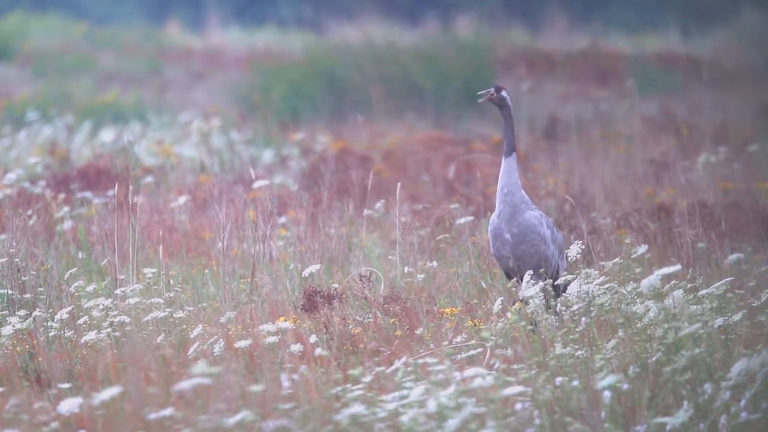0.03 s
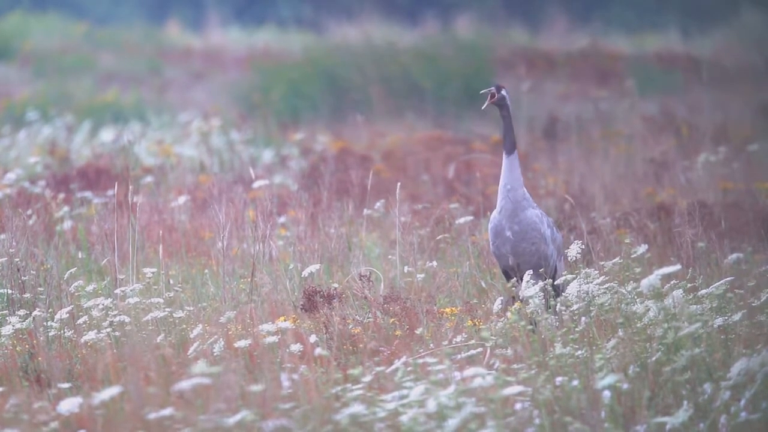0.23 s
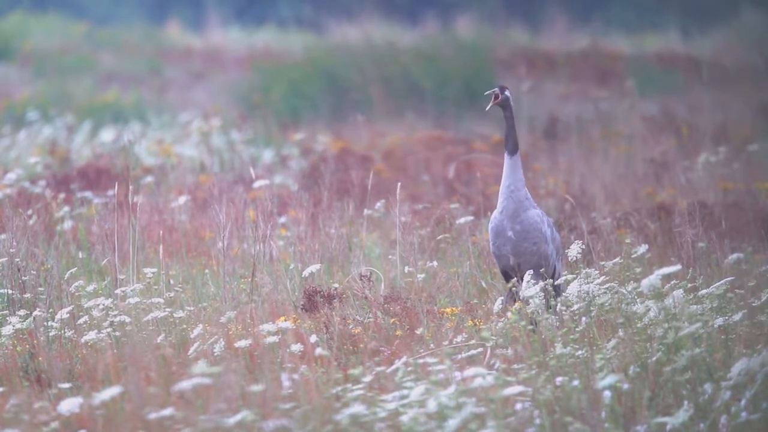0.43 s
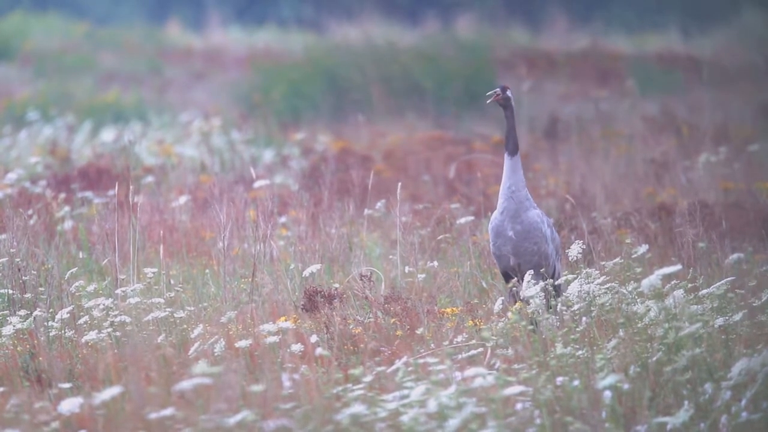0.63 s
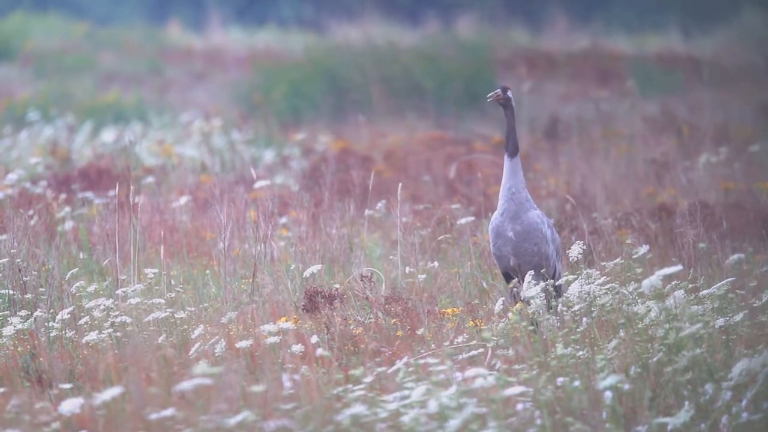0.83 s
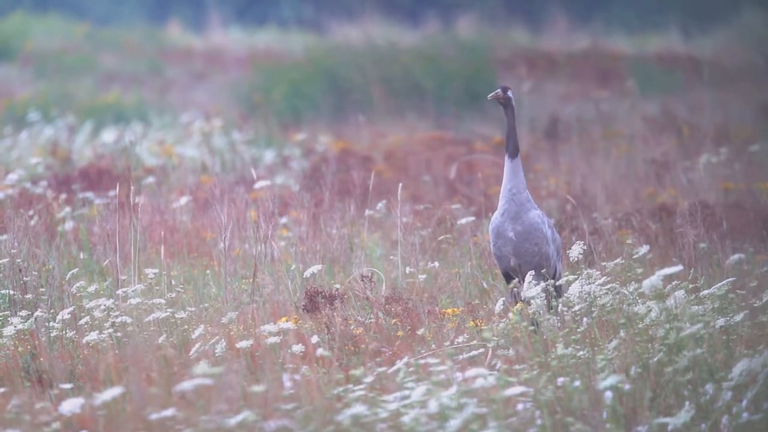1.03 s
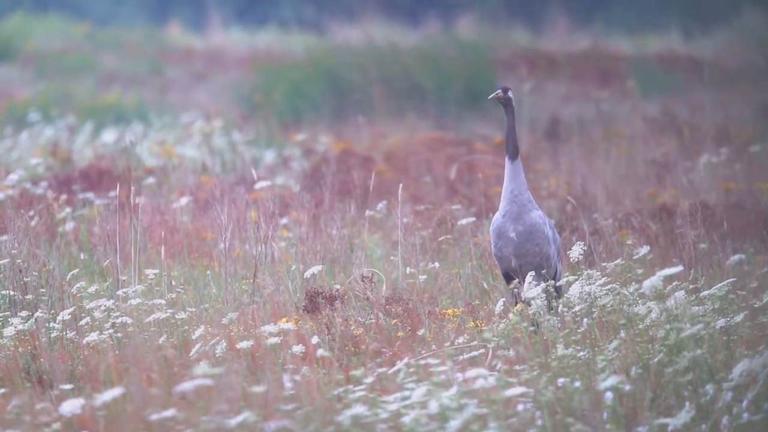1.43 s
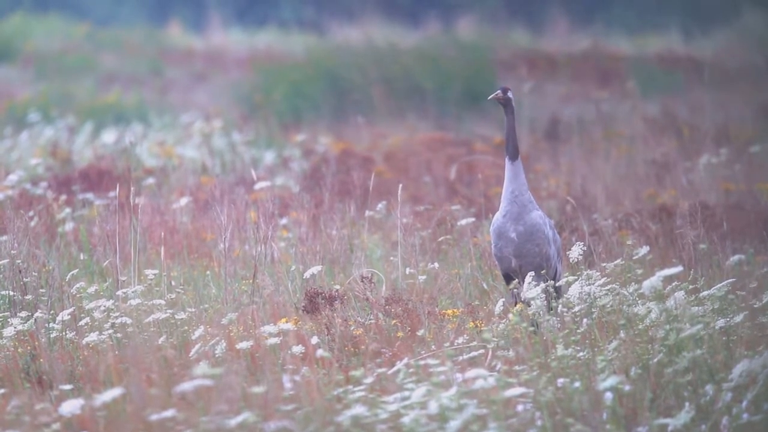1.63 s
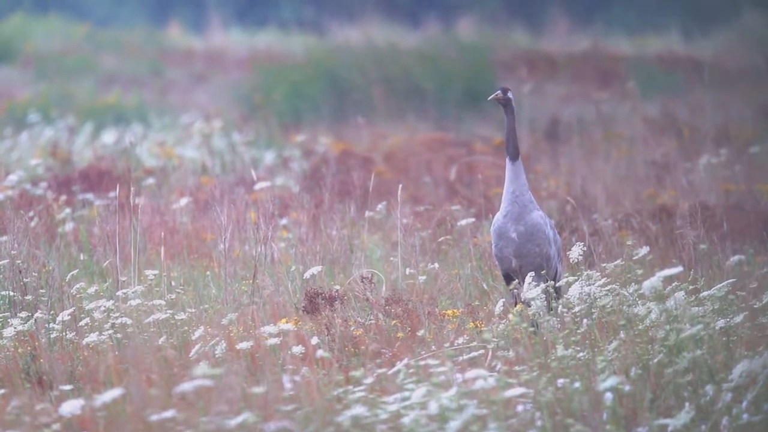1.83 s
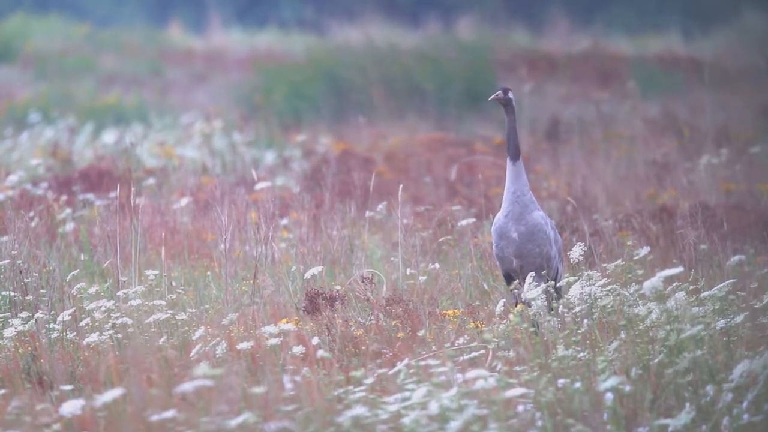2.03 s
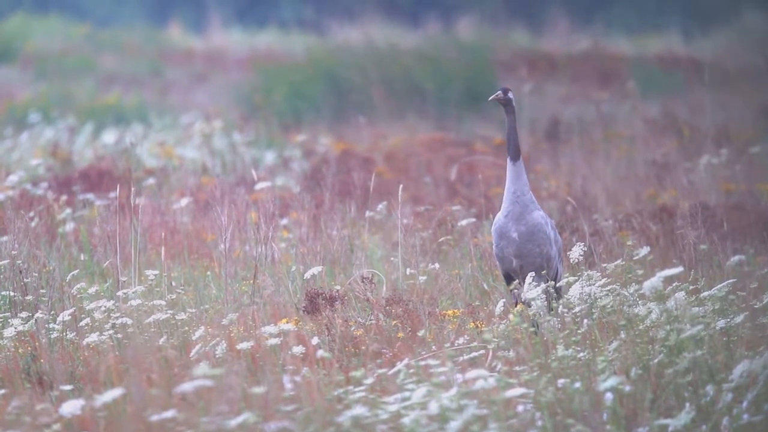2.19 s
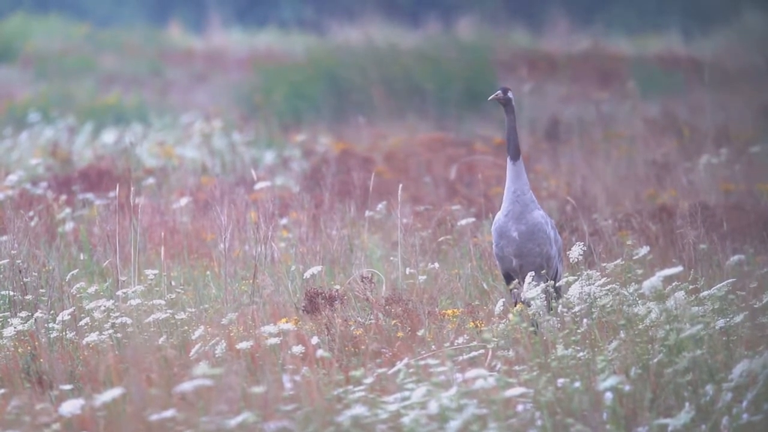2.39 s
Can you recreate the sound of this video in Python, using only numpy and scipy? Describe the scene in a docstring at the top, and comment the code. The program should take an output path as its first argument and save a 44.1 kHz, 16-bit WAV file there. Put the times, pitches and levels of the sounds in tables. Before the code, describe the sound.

Cranes give a loud, short trumpeting call that echoes across a meadow, small birds chirping faintly.

```python
"""Crane duet on an open meadow

Two cranes bugle, reedy voices ringing through long windpipes: the near one stutters into a bright,
held note, and its mate joins higher and steps down. The calls scatter off the grass, linger in the
bushes and return late from the forest edge. Small birds whistle thinly and churr over quiet air
and the rumble of distant traffic, all in mono."""
import sys
import numpy as np
from scipy import signal
from scipy.fft import rfft, irfft, next_fast_len
from scipy.io import wavfile

SR = 44100
rng = np.random.default_rng(int(sys.argv[2]) if len(sys.argv) > 2 else 0)


def wav_out(sig):
    """Save sig, one row per channel (or a flat mono array), as 16-bit PCM at SR to the path in sys.argv[1]."""
    wavfile.write(sys.argv[1], SR, np.round(np.clip(np.atleast_2d(sig).T, -1, 1) * 32767).astype(np.int16))


N = 112454


def undb(db):
    """Decibels to gain."""
    return 10 ** (np.asarray(db) / 20)


def unit(x):
    """Scale to rms 1."""
    return x / np.sqrt(np.mean(x ** 2))


def gain_at(hz, points):
    """Gain of an EQ curve (frequency [Hz], level [dB]) at the given frequencies."""
    f, db = np.array(points, float).T
    return undb(np.interp(np.log(np.maximum(hz, 1)), np.log(f), db))


def equalise(x, points):
    """Colour a signal with an EQ curve."""
    return irfft(rfft(x) * gain_at(np.arange(N // 2 + 1) * SR / N, points), N)


def noise(points):
    """Noise coloured by an EQ curve, rms 1."""
    return unit(equalise(rng.standard_normal(N), points))


def band(hz, width):
    """Noise in one bell-shaped band, rms 1; around 0 Hz it is a random waver."""
    size = next_fast_len(N, real=True)
    f = np.arange(size // 2 + 1) * SR / size
    bell = np.exp(-((f - hz) / width) ** 2 / 2)
    return unit(irfft(rfft(rng.standard_normal(size)) * bell, size)[:N])


def cut(x, hz, kind, order):
    """Low-pass or high-pass."""
    return signal.sosfilt(signal.butter(order, hz, kind, fs=SR, output="sos"), x)


def meadow(t):
    """The ambience bed: quiet air, a drone of distant traffic and the dry churring of far birds."""
    # colour of the air (frequency [Hz], relative level [dB])
    air_colour = [(25, -39), (45, -7), (70, -4), (120, -4.5), (250, -9), (400, -8), (560, -16), (900, -5.5),
                  (1600, -15.5), (3000, -15), (4500, -18), (6000, -17.5), (10000, -24), (15500, -27)]
    # traffic drone bands (centre [Hz], width [Hz], level [dB])
    drone_bands = [(66.2, 5.7, -67), (92, 15, -66), (221.6, 8.8, -67)]
    # churrs (peak time [s], half length [s], centre [Hz], half width [Hz], level [dB])
    churrs = [(1.558, 0.15, 3630, 352, -61.5), (2.033, 0.25, 3920, 386, -57),
              (2.04, 0.21, 4730, 218, -56.5)]
    air = undb(-55 + .5 * band(0, 3.7)) * noise(air_colour)
    drone = sum(undb(db) * band(hz, width / 2) for hz, width, db in drone_bands)
    churring = sum(undb(db + band(0, 49.5)) * np.exp(-((t - peak) / length) ** 2 / 2) * band(hz, width)
                   for peak, length, hz, width, db in churrs)
    return air + drone + churring


def bird_whistles(t):
    """Nearly pure notes, each bending in pitch as it swells and fades with a light flutter."""
    # small birds' thin whistles
    # (time [s], length [s], start pitch [Hz], middle pitch [Hz], end pitch [Hz], level [dB])
    whistles = [(0.147, 0.082, 7100, 7050, 6680, -57), (0.925, 0.091, 6700, 7040, 6970, -52.5),
                (1.076, 0.11, 6900, 6780, 6750, -57), (1.243, 0.063, 6620, 6500, 6380, -54),
                (1.803, 0.07, 8200, 7420, 7240, -63), (1.936, 0.077, 7500, 6920, 6950, -55),
                (2.06, 0.085, 7100, 6950, 7300, -57), (2.207, 0.064, 7150, 6930, 6760, -53),
                (2.389, 0.069, 6830, 6680, 6600, -54), (2.495, 0.062, 6600, 6580, 6310, -50)]
    # lower calls of far birds (same columns)
    far_calls = [(1.999, .2, 2180, 2043, 1950, -58), (2.2, 0.17, 1595, 1585, 1550, -55.5)]
    waver = 1 + .007 * band(0, 161)
    flutter_db = 2.5 * band(0, 90)
    notes = np.zeros(N)
    for start, length, first_hz, middle_hz, last_hz, db in whistles + far_calls:
        progress = np.clip((t - start) / length, 0, 1)
        bend = np.polyfit([0, .5, 1], [first_hz, middle_hz, last_hz], 2)
        hz = np.polyval(bend, progress) * waver
        swell = undb(db) * np.sqrt(2) * np.sin(np.pi * progress)
        notes += swell * np.sin(2 * np.pi * np.cumsum(hz) / SR)
    return notes * undb(flutter_db)


def crane_voice(t, phrase, treble, windpipe, jitter, flutter_hz, rasp_db, rasp_top_hz, dulling):
    """A reed-like voice: slight roughness shakes its pitch, more shakes its level and lets air rasp."""
    # rasp of air in the windpipe (frequency [Hz], relative level [dB])
    rasp_colour = [(350, -60), (520, -35), (720, -9.5), (950, -7.5), (1200, -13.5), (1600, -16),
                   (2100, -14), (3400, -22.5), (5500, -25), (9000, -28), (13000, -49), (16000, -54)]
    break_roughness = .6  # here the voice has fully broken into rasp
    times, hz, db, rough = np.array(phrase, float).T
    hz = np.interp(t, times, hz)
    rough = np.interp(t, times, rough)
    broken = rough * np.minimum(rough / break_roughness, 1)
    envelope = undb(np.interp(t, times, db, left=-150, right=-150))
    treble_gain = undb(np.interp(t, *np.array(treble, float).T))
    phase = 2 * np.pi * np.cumsum(hz * (1 + jitter * rough * band(0, flutter_hz))) / SR
    tone, power = 0, 0
    for k in range(1, 19):
        gain = gain_at(k * hz, windpipe) * (k * hz < SR / 2) * (treble_gain if k > 2 else 1)
        sway = undb(2 * band(0, 12)) if k > 2 else 1  # each upper harmonic sways on its own
        # faint tones halfway between the harmonics stand out most in the treble
        half_harmonic = undb(-42) * k ** .86 * np.cos((k + .5) * phase)
        tone -= gain * (sway * np.cos(k * phase) + half_harmonic)
        power += gain ** 2 / 2
    shimmer = 1 + .5 * broken * band(0, flutter_hz / 2)
    breath = cut(noise(rasp_colour), rasp_top_hz, "low", order=1)
    rasp = undb(rasp_db) * broken * breath * (1 + .5 * np.cos(phase))  # one puff a cycle
    voice = envelope * (tone / np.sqrt(power) * shimmer + rasp)
    body = cut(voice, 3060, "low", order=1)
    brightness = (envelope / envelope.max()) ** dulling  # a weak voice loses treble
    return cut(body + (voice - body) * brightness, 628, "high", order=8)  # the windpipe radiates no bass


def near_crane(t):
    """A stutter, then a bright bugle: the long windpipe resonates at multiples of the held note."""
    # the call (time [s], pitch [Hz], level [dB], roughness [0 = clean, about 1 = harsh])
    phrase = [(.156, 820, -52, 1.2), (.158, 760, -42, 1.2), (.176, 760, -39, 1.2), (.186, 760, -49, .9),
              (.2295, 790, -58, .6), (.2318, 815, -25, .25), (.238, 810, -24, .25), (.243, 760, -30, .7),
              (.252, 750, -27, .7), (.259, 735, -34, .3), (.2858, 735, -40, .3), (.2868, 935, -20, .25),
              (.294, 930, -17.5, .25), (.298, 850, -22, .6), (.312, 846, -19.5, .32),
              (.36, 851, -18.5, .22), (.415, 854.5, -16.5, .03), (.47, 853.3, -17, .03),
              (.53, 849, -17, .08), (.565, 838, -20, .12), (.585, 834, -19.5, .14), (.602, 806, -23, .3),
              (.61, 785, -23, .95), (.622, 780, -23.5, 1), (.64, 720, -29, .8), (.675, 705, -30.5, .85),
              (.705, 690, -43, 1)]
    # lift of the harmonics above the second (time [s], level [dB])
    treble = [(.18, -17), (.23, 1.5), (.29, 1), (.39, -.5), (.52, -2), (.58, 1.5), (.62, -.5)]
    # windpipe resonances, from the first upwards (level [dB])
    resonances = [-2, 0, -15, -10, -23, -15.5, -21.5, -20, -18.5, -19, -26, -25, -18.5, -23, -26, -27, -34,
                  -42]
    windpipe_hz = 852
    windpipe = [(k * windpipe_hz, db) for k, db in enumerate(resonances, 1)]
    return crane_voice(t, phrase, treble, windpipe,
                       jitter=.06, flutter_hz=450, rasp_db=-4, rasp_top_hz=14000, dulling=.36)


def mate_crane(t):
    """The mate joins higher, climbs and steps down, with a darker rasp in its windpipe."""
    # the call (time [s], pitch [Hz], level [dB], roughness [0 = clean, about 1 = harsh])
    phrase = [(.468, 1020, -48, .9), (.474, 1020, -25, .5), (.498, 1010, -28, .65), (.515, 1100, -34, .8),
              (.521, 1136, -21, .25), (.575, 1145, -20, .08), (.61, 1153, -25, .12), (.64, 1163, -23, .15),
              (.661, 1190, -24, .25), (.668, 1260, -21, .25), (.715, 1260, -24, .1),
              (.78, 1253, -18.5, .03), (.795, 1238, -21, .12), (.802, 1137, -22, .5),
              (.822, 1125, -22, .22), (.857, 1100, -22, .2), (.868, 1085, -26, .35), (.878, 1030, -24, .5),
              (.882, 895, -27, .65), (.915, 875, -30.5, .65), (.96, 840, -39, .9), (.985, 810, -54, .9)]
    # lift of the harmonics above the second (time [s], level [dB])
    treble = [(.53, -7), (.57, 1), (.62, 8.5), (.66, -1), (.72, 0.5), (.82, -4.5), (.89, -7)]
    # windpipe resonances (frequency [Hz], level [dB])
    windpipe = [(700, -7), (900, -3), (1200, 0), (1800, -3), (2250, -11.5), (2520, -22), (3000, -22),
                (3500, -16), (3780, -17), (4600, -21), (5100, -27), (5700, -38), (11400, -44), (15000, -62)]
    return crane_voice(t, phrase, treble, windpipe,
                       jitter=.055, flutter_hz=400, rasp_db=-2, rasp_top_hz=2400, dulling=.3)


def scatter(x, envelope, colour):
    """Countless small reflections whose strength follows the envelope."""
    reflections = rng.standard_normal(N) * envelope / np.sqrt(np.sum(envelope ** 2))
    return signal.fftconvolve(x, equalise(reflections, colour))[:N]


def grass(t, x):
    """Quick, bright scatter off the plants nearby."""
    t60_s, predelay_s = .44, .004
    decay = undb(-60 * t / t60_s) * (t > predelay_s)
    return scatter(x, decay, [(700, 6.5), (2000, 3.5), (5000, 9.0), (14000, -1.1)])


def forest(t, x):
    """A long tail from scattered bushes, then late echoes from the forest edge."""
    # what the bushes scatter back (frequency [Hz], level [dB])
    tail_colour = [(500, 7.5), (1150, 4.5), (1700, -5.5), (2400, 2.5), (5000, -5), (8000, -2.5),
                   (16000, -30)]
    # echoes from the forest edge (delay [s], spread [s], send level [dB])
    echoes = [(1.271, 0.12, -46), (1.69, 0.088, -43), (1.981, 0.28, -37.5)]
    # what survives the long way through the air (frequency [Hz], level [dB])
    far_colour = [(600, 2.5), (1200, 12), (1700, -2), (2300, 15.5), (2700, 0.5), (3600, 4), (5500, 3),
                  (12000, -49)]
    t60_s, rise_s = 1.92, .0077
    tail = scatter(x, undb(-60 * t / t60_s) * (1 - np.exp(-t / rise_s)), tail_colour)
    late = sum(undb(db) * scatter(x, np.exp(-((t - delay) / spread) ** 2), far_colour)
               for delay, spread, db in echoes)
    return undb(-13) * tail + late


def scene():
    """Both cranes, their reflections and the small birds over the meadow bed."""
    t = np.arange(N) / SR
    near, mate = near_crane(t), mate_crane(t)
    birds = bird_whistles(t)
    send = near + undb(.5) * mate  # the mate stands further off, so more of its voice is echo
    cranes = near + mate + undb(-12) * grass(t, send) + forest(t, send)
    mono = cranes + birds + .3 * grass(t, birds) + meadow(t)
    return np.array([mono, mono])


def record(dry):
    """A steep low-pass takes off the very top."""
    top_hz = 15800
    return signal.sosfilt(signal.ellip(10, .2, 80, top_hz, fs=SR, output="sos"), dry)


dry = scene()
out = record(dry)
wav_out(out)
```